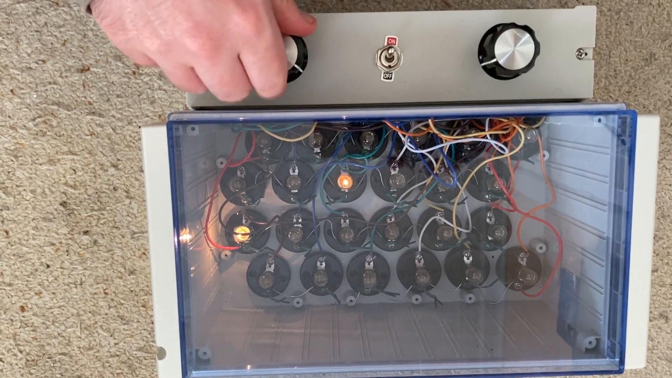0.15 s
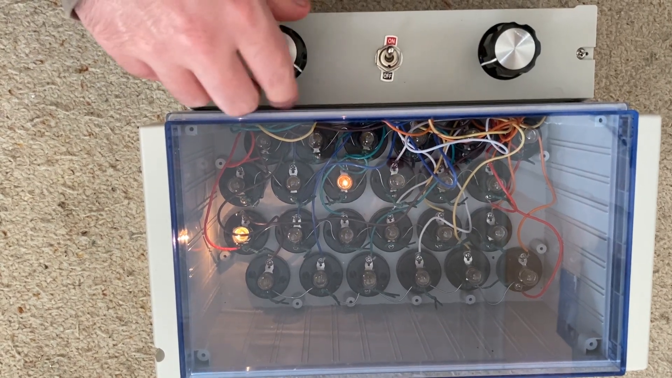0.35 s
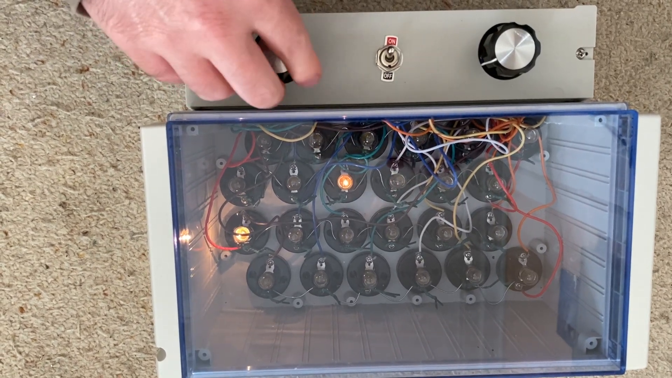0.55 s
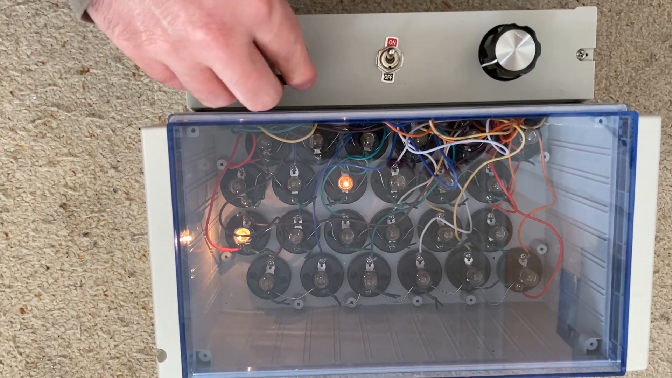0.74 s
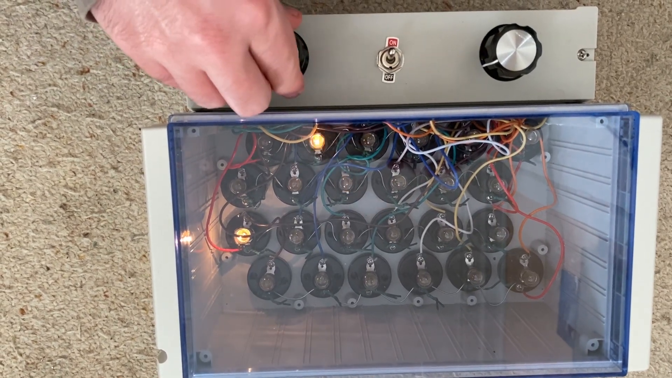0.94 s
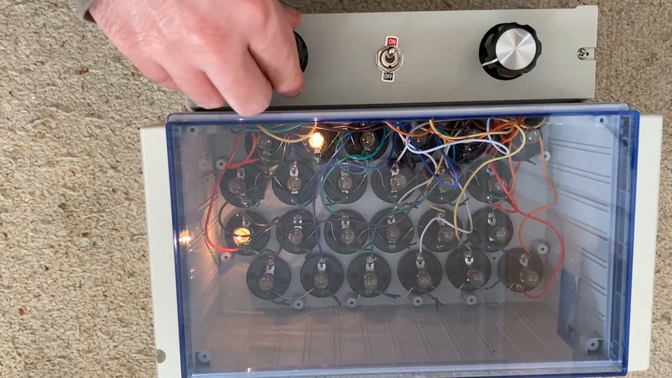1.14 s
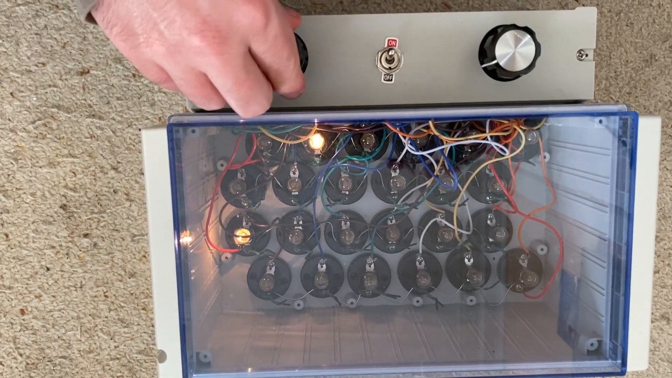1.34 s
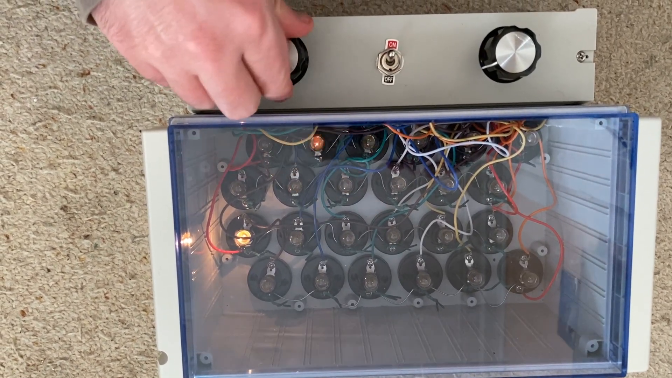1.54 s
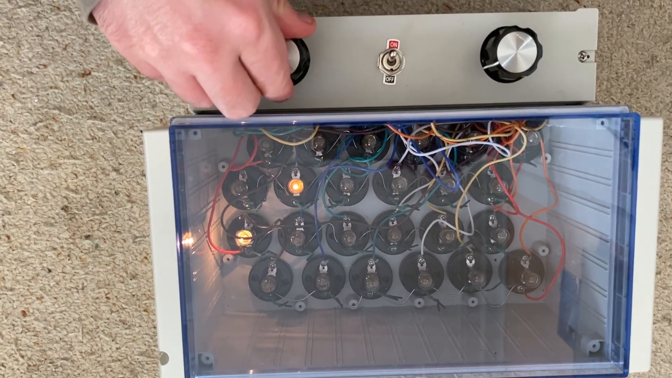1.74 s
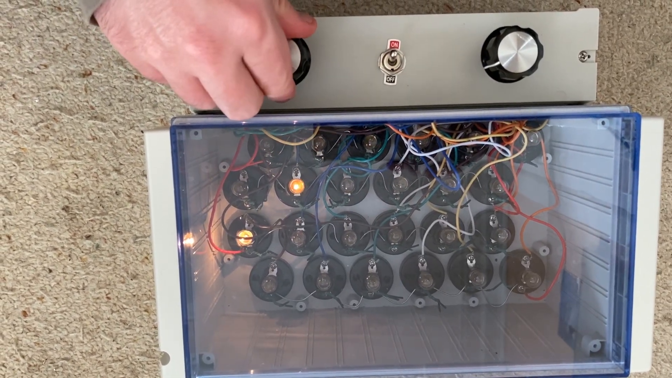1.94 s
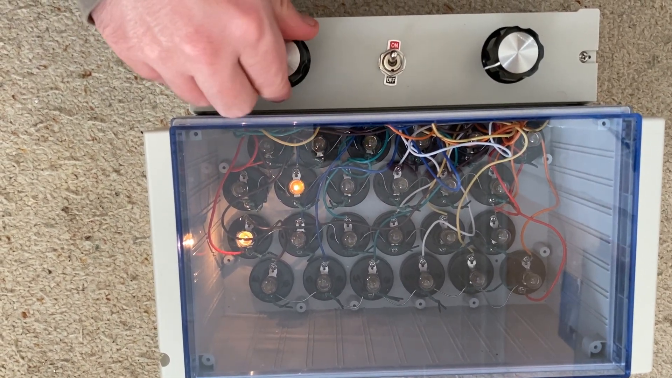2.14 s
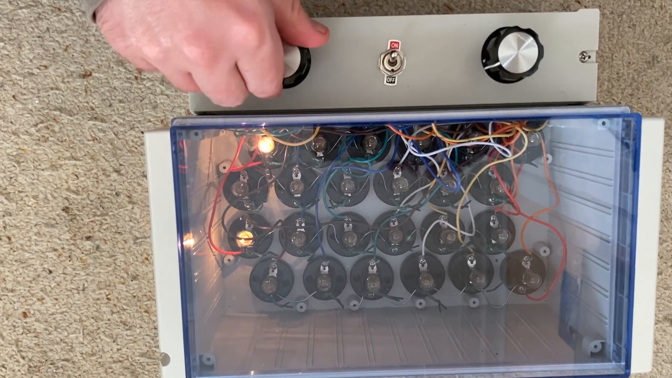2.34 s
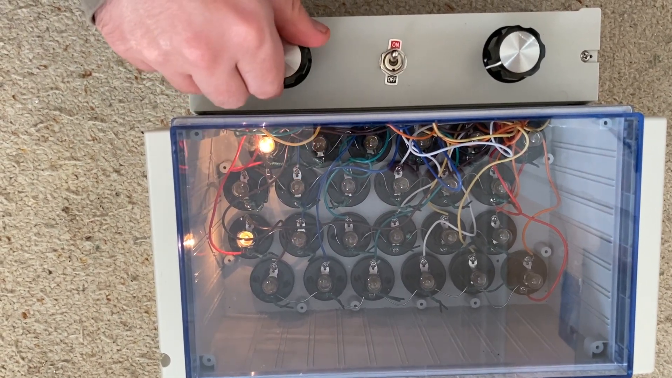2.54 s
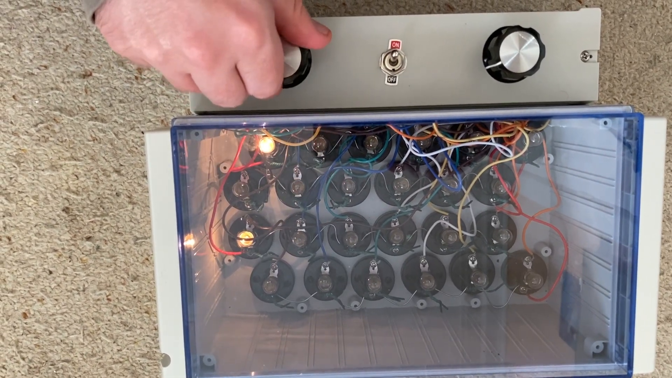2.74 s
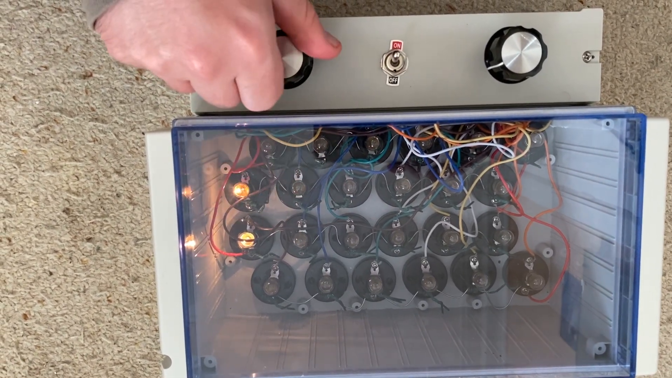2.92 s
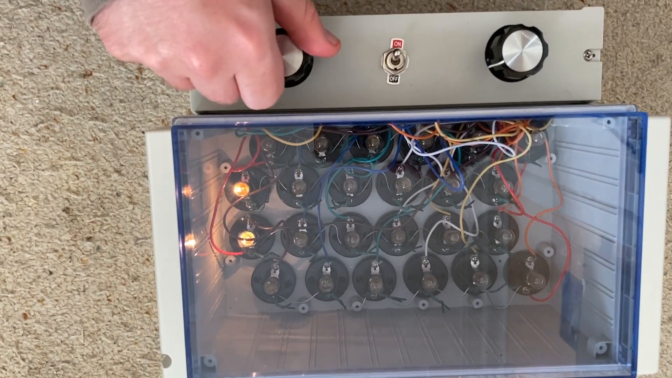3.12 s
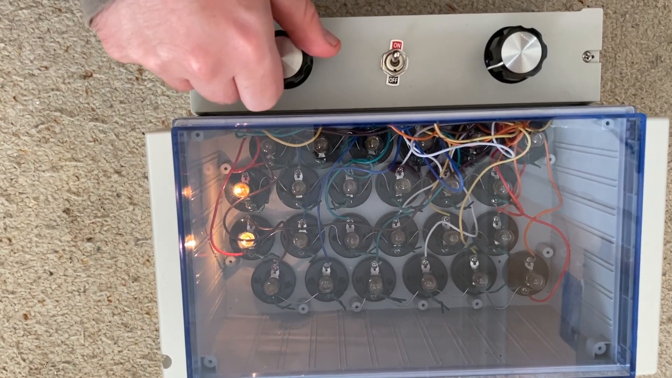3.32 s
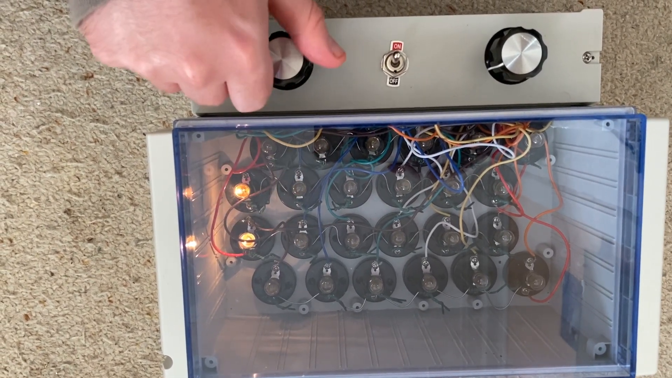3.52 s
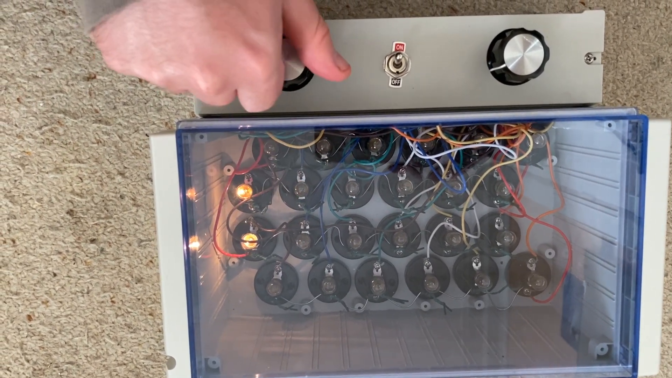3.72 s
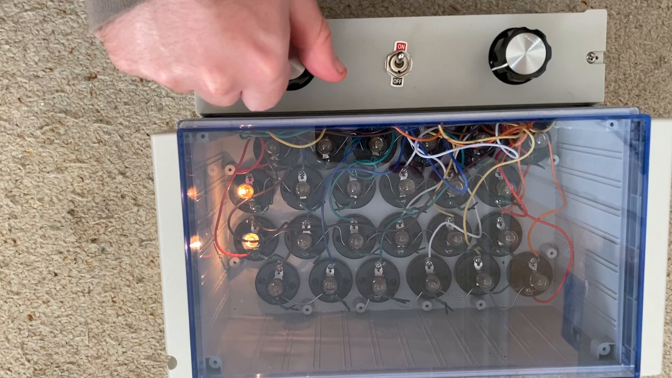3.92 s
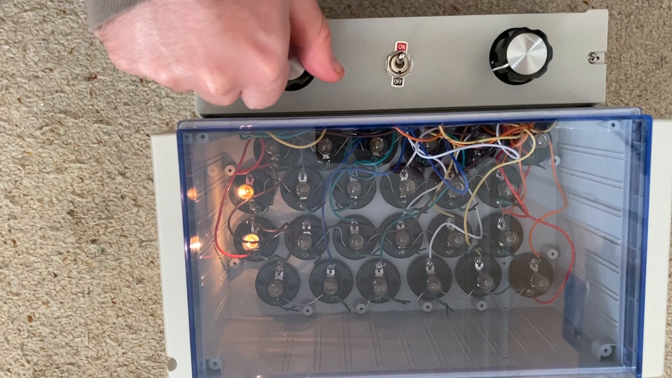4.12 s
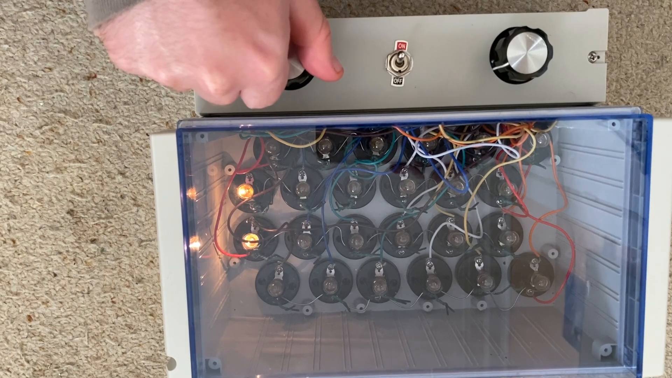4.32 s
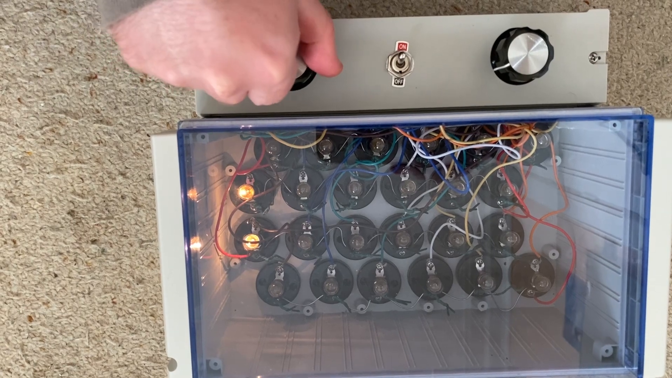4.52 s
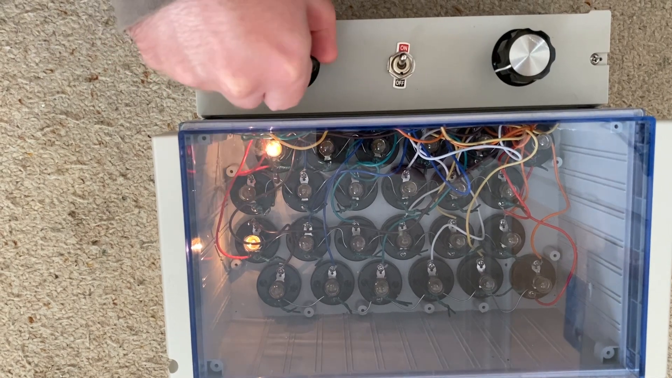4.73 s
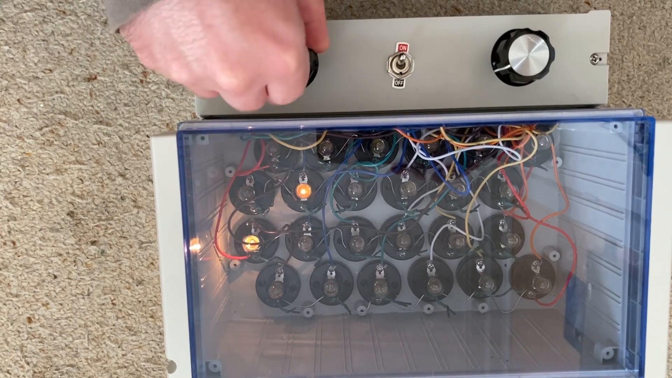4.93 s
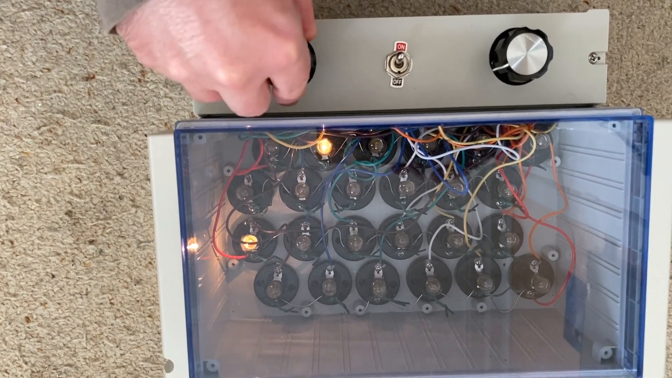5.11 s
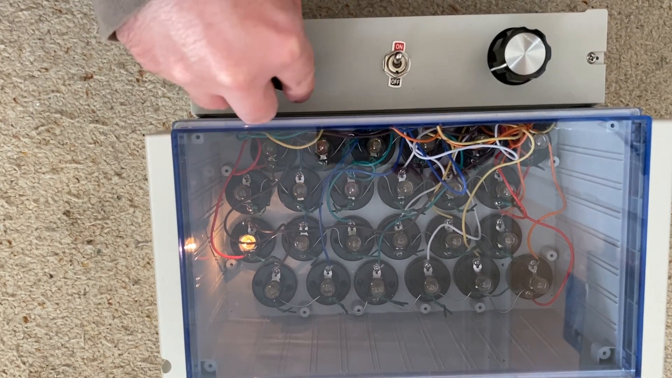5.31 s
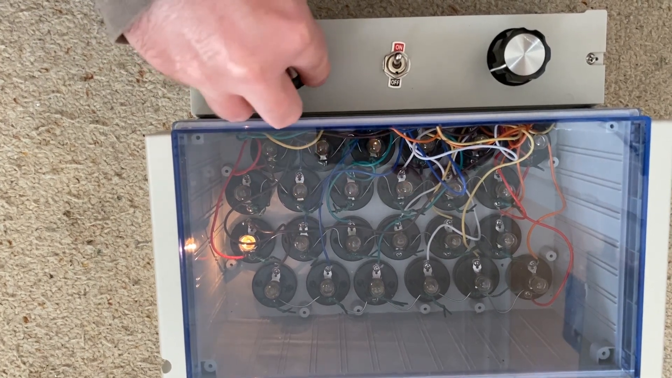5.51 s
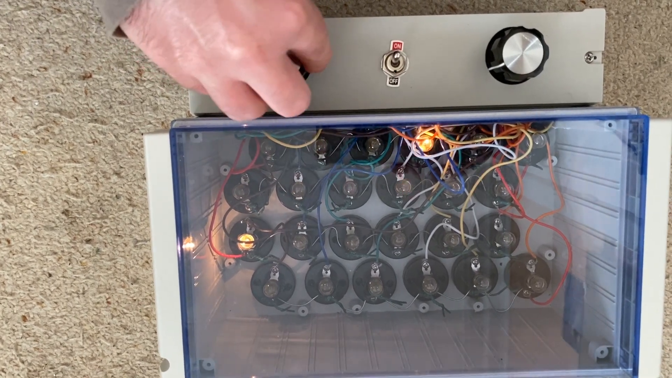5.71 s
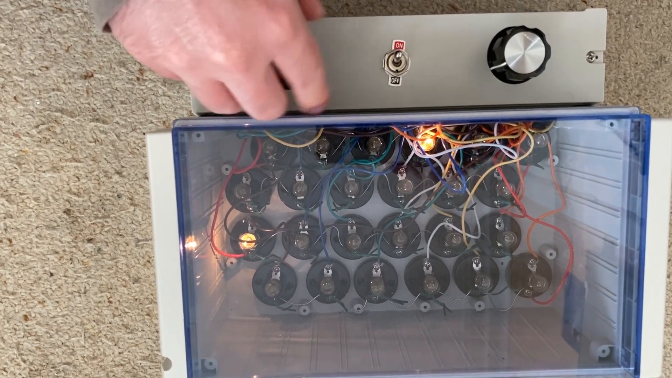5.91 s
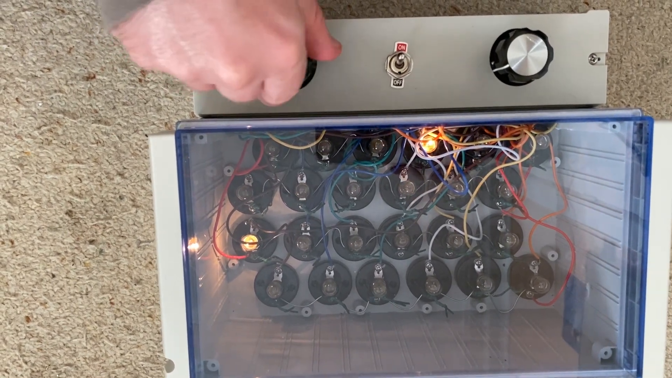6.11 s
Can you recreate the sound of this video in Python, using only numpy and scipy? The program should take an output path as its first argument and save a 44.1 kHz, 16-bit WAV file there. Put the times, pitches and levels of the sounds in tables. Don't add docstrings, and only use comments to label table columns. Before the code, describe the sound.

Sharp metallic snaps of a rotary switch, a few spaced clicks, a near-quiet pause, then a quick run ending in dull finger knocks over low hum.

```python
import sys
import numpy as np
from scipy import signal
from scipy.fft import rfft, irfft
from scipy.io import wavfile
from scipy.ndimage import uniform_filter1d

SR = 44100
rng = np.random.default_rng(int(sys.argv[2]) if len(sys.argv) > 2 else 0)


def boost_factor(decibels):
    exponent = np.asarray(decibels, float) / 20
    return 10 ** exponent


def generate_wav(sig):
    pcm = np.round(np.clip(np.atleast_2d(sig).T, -1, 1) * 32767).astype(np.int16)
    wavfile.write(sys.argv[1], SR, pcm)


N = 271656

# mode_hz, level_db, t60_s
SPRING_MODES = [(6500, -9.5, 0.023), (7470, -1, 0.0038), (8360, -7.5, 0.017), (8670, 0.5, 0.0019),
                (10310, -5.5, 0.0088), (11510, 0, 0.0025), (11610, -6.5, 0.0065), (13020, -7, 0.0034),
                (14940, -16.5, 0.006), (15400, -30, .005)]
PLATE_MODES = [(3030, -10.5, 0.036), (3330, -12, 0.0098), (4020, -0.5, 0.0094), (4430, -3.5, 0.013),
               (4626, 0, 0.013), (5286, -12.5, 0.04), (6135, -2, 0.0081)]
HOUSING_MODES = [(1350, 2.5, 0.015), (1546, -7, 0.041), (1778, 5.5, 0.012), (2068, -1, 0.03),
                 (2475, 4.5, 0.0089)]
LID_MODES = [(562, -24, 0.12), (708, -18, 0.21), (786.4, 0.5, 0.055), (912, -7, 0.061), (1041, 0, 0.022)]
PANEL_MODES = [(152.2, -12, 0.2), (257, -10.5, 0.13), (337.5, 0.5, 0.084), (430, -33.5, 0.04),
               (471, -26.5, 0.42)]
PART_MODES = [SPRING_MODES, PLATE_MODES, HOUSING_MODES, LID_MODES, PANEL_MODES]
# contact_s, offset_db, hit_spread_db, port_unlikeness, right_lag_samples, pan_db
PART_PICKUP = [(.00035, -7.5, 3.5, 0.097, 0.5, -5), (.0007, -5, 2.5, 0.61, -2.5, 6),
               (.001, -9.5, 1, 0.45, 5.5, -0.5), (.0012, -2.5, 1.5, 0.35, 3.5, -0.5),
               (.004, -3, -1.23, 0.15, 8.5, -1)]
# level_db, t60_s, colour_sharpness
ROOM_TAILS = [(-32, 0.31, 0), (-22.5, 0.29, 0.36), (-18.5, 0.24, 1), (-16.5, 0.32, 1.5), (-20, 0.66, 0.6)]

# start_s, snap_db, bounce_db, rebound_after_s, rebound_db
DETENTS = [(0.9007, -33.5, -42, 0.008, -38), (1.5451, -33, -39.5, 0.0087, -42.5),
           (2.204, -43, -44.5, .0133, -53.5), (2.801, -35.5, -47.5, 0.013, -46),
           (4.6239, -27.5, -65, 0.0051, -37.5), (4.804, -35, -77, 0.0062, -49.5),
           (5.063, -31.5, -40.5, 0.0095, -41), (5.278, -27.5, -38, .007, -41),
           (5.3974, -29, -42, 0.0093, -46), (5.5011, -29.5, -49.5, 0.0079, -45),
           (5.6402, -29.5, -58, 0.0093, -44.5)]
# spring_db, plate_db, housing_db, lid_db, panel_db
SNAP_SHARE_DB = [0.5, -11.5, -11.5, -25, -24]
BOUNCE_SHARE_DB = [5, 0.5, 0.5, -8, -12.5]
REBOUND_SHARE_DB = [-1.5, -5.5, -1.5, -8.5, -8]
# start_s, spring_plate_tick_db, housing_click_db, lid_tap_db, panel_thud_db
KNOCKS = [(0.149, -84, -79, -85, -52), (0.316, -89, -71, -57, -48), (0.3277, -54.5, -45, -37, -29),
          (0.85, -69, -58, -57, -57), (1.084, -86.5, -89, -75, -80), (1.5148, -57.5, -58, -60.5, -67),
          (1.527, -83, -76, -82, -46), (1.554, -73, -82, -52, -41.5), (2.1518, -57.5, -53, -52.5, -43),
          (2.222, -74, -73, -47, -44), (2.7557, -61, -63, -62.5, -48), (2.812, -75, -64.5, -45.5, -40),
          (3.4393, -80, -63, -58, -47.5), (3.452, -90, -71, -65, -46), (4.5111, -76.5, -65, -61, -49),
          (4.534, -93, -58, -58, -54.5), (4.607, -90, -79, -85, -56.5), (4.9947, -70, -67, -88, -77),
          (5.7712, -80, -92, -92, -61), (5.866, -91, -64, -70, -54.5), (5.9397, -50.5, -47, -48, -31.5),
          (5.9658, -59, -41.5, -39, -36), (5.972, -60.5, -54, -31, -21)]
# centre_s, pitch_hz, level_db, half_length_s
SQUEAK = (5.826, 11500, -82, .013)
# peak_s, level_db, pitch_hz, fall_20db_s (floored at 0.02)
PUSHES = [(0.03, -44.5, 54.2, 0.6), (0.159, -45.5, 54.2, 0.55), (0.241, -50, 47, -5),
          (0.411, -50.5, 43.9, 1.32), (0.942, -43.5, 52.02, 0.02), (1.15, -63, 45.44, .5),
          (1.418, -54, 61.9, -0.1), (1.63, -47, 55.32, -0.04), (1.97, -69, 46.65, -0.5),
          (2.21, -43.5, 55.4, -0.07), (2.398, -51, 55.4, 0.43), (2.618, -47, 53.8, 0.09),
          (2.75, -45.5, 59.6, -0.05), (2.849, -53.5, 58.8, 0.37), (3.079, -55, 62.14, 0.11),
          (3.269, -61, 49.4, 0.94), (3.459, -52, 46.2, 0.09), (4.15, -64, 52, 0.1),
          (4.38, -68.5, 53.8, -0.4), (4.679, -39.5, 60.7, 0.0432), (4.87, -48.5, 66.25, .06),
          (5.039, -43, 67.9, 0.01), (5.109, -50, 63.9, 0.15), (5.33, -46.5, 61.87, 0.03),
          (5.47, -54.5, 57.7, 0.14), (5.58, -51.5, 59.64, .08), (5.73, -56.5, 60.3, .08),
          (5.88, -65, 63.5, -3.5), (6.001, -36, 61.8, .085)]
# time_s, effort_db
EFFORT = [(0, 0.5), (.38, 7), (.62, 1), (.93, 6.5), (1.3, 0), (1.62, 9.5), (1.92, -5.5), (2.2, 1),
          (2.55, -9.5), (2.86, 7), (3.08, 5), (3.29, -7.5), (3.5, -4), (3.85, -11.5), (4.5, -7.5),
          (4.7, 6.5), (4.92, -4.5), (6.16, -1)]

# level_db, effort_db_per_db, push_db_per_db, drift_db
DEEP_STIR = (-68.5, 1, 0.5, 6)
LOW_STIR = (-61, 0.33, 0.3857, 1.5)
RUB_STIR = (-78.5, 1.02, 0.11, 3.3)
# freq_hz, density_db_per_hz
DEEP_SPECTRUM = [(28, -18.0), (36, 11.5), (41, 18), (50, -3), (70, -54.5)]
LOW_SPECTRUM = [(50, -15.5), (64, 4.5), (82, 3.0), (120, -2.5), (150, -13), (200, -21.0), (300, -68.0)]
LEAD_IN_SPECTRUM = [(300, -27.5), (800, 6.0), (2000, -8), (6000, -11.5), (9000, -38)]
FLAT_SPECTRUM = [(50, 0), (20000, 0)]
RUB_SPECTRUM = [(180, 3.5), (330, -1.5), (520, -12.5), (780, -6), (1200, -13), (2000, -23), (3500, -46)]
HISS_SPECTRUM = [(100, -2.5), (200, -8.5), (400, -11), (1000, -20.5), (2500, -26), (5000, -29), (9000, -33),
                 (13000, -39), (16000, -67.5)]
# freq_hz, likeness
PORT_LIKENESS = [(60, 0.93), (150, 0.88), (300, 0.64), (640, 0.038), (2000, 0.12), (6000, 0.085)]

BOUNCE_AT = 0.36
SPRING_LOSS_DB_PER_S = 801.5
LEAD_IN_DB, LEAD_IN_S = -23.5, 0.0087
ROOM_ONSET_S, GATE_S, MUFFLE = 0.0075, 0.12, 0.12
PUSH_RISE = 0.88
BOARD_MEAN_DB, HISS_DB = -58, -78
WHINE_HZ, WHINE_DB = 14300, -111
MERGE_HZ, MERGE_SHARE, PORT_LAG_SAMPLES = 6690, 0.97, 10
SELF_NOISE_DB, TOP_HZ = -95.5, 16700


def switch():
    hits, direct = contacts(), 0
    for k, modes in enumerate(PART_MODES):
        contact_s, offset_db, spread_db, unlike, lag_samples, pan_db = PART_PICKUP[k]
        left, right = part(modes, hits[:, k + 1] + offset_db, contact_s, spread_db, unlike)
        right = np.roll(right, round(lag_samples))
        direct = direct + np.array([left * boost_factor(pan_db / 2), right * boost_factor(-pan_db / 2)])
    return direct


def contacts():
    rows = [(s, tick, tick, click, tap, thud) for s, tick, click, tap, thud in KNOCKS]
    for s, snap_db, bounce_db, after_s, rebound_db in DETENTS:
        slack_db = np.eye(5)[0] * SPRING_LOSS_DB_PER_S * after_s
        rows.append((s, *np.add(snap_db, SNAP_SHARE_DB)))
        rows.append((s + BOUNCE_AT * after_s, *np.add(bounce_db, BOUNCE_SHARE_DB)))
        rows.append((s + after_s, *(rebound_db + np.array(REBOUND_SHARE_DB) - slack_db + 4.5)))
    return np.array(rows)


def part(modes, hit_db, contact_s, spread_db, unlike):
    t = np.arange(900) / SR
    shape = t / contact_s * np.exp(-t / contact_s)
    at = (contacts()[:, :1] * SR).astype(int) + np.arange(900)
    out = np.zeros((2, N))
    for hz, level_db, t60_s in modes:
        draw = rng.standard_normal((len(at), 3, 901))
        gain = boost_factor(hit_db + level_db + spread_db * draw[:, 0, 0])
        for port in range(2):
            rattle = shape * (draw[:, 0, 1:] + unlike * draw[:, 1 + port, 1:])
            push = np.abs(rattle @ np.exp(-2j * np.pi * hz * t))
            typical = np.sqrt(np.sum(rattle ** 2, axis=1))
            rattle *= (gain / np.maximum(push, typical / 2))[:, None]
            force = np.bincount(at.ravel(), rattle.ravel(), N)[:N]
            out[port] += ring(force, hz, t60_s)
    return soften(out, modes, 1.48)


def ring(force, hz, t60_s):
    radius = boost_factor(-60 / (max(t60_s, .002) * SR))
    w = 2 * np.pi * min(hz, .45 * SR) / SR
    return signal.lfilter([0, np.sin(w)], [1, -2 * radius * np.cos(w), radius * radius], force + 1e-18)


def soften(x, modes, reach):
    edge_hz = min(reach * modes[-1][0], .45 * SR)
    return signal.sosfilt(signal.butter(3, edge_hz, fs=SR, output="sos"), x)


def lead_in():
    lead = SR // 20
    rise = np.exp((np.arange(lead) - lead) / SR / LEAD_IN_S)
    envelope = np.roll(swell(contacts()[:, 3] + LEAD_IN_DB, rise), -lead)
    return envelope * coloured(LEAD_IN_SPECTRUM)


def swell(hit_db, shape):
    energy = np.bincount((contacts()[:, 0] * SR).astype(int), boost_factor(2 * hit_db), N)
    return np.sqrt(np.maximum(signal.fftconvolve(energy, shape ** 2)[:N], 0))


def squeak():
    centre_s, hz, level_db, half_s = SQUEAK
    pressure = np.exp(-((np.arange(N) / SR - centre_s) / half_s) ** 2)
    return boost_factor(level_db) * pressure * rms_one(ring(rng.standard_normal(N), hz, .015))


def room():
    hits, t, out = contacts(), np.arange(SR // 3) / SR, 0
    diffuse = coloured(FLAT_SPECTRUM)
    for k, modes in enumerate(PART_MODES):
        level_db, t60_s, sharpness = ROOM_TAILS[k]
        onset = 1 - np.exp(-t / ROOM_ONSET_S)
        gate = np.exp(-(t / GATE_S) ** 5.0)
        fall = boost_factor(-60 * t / t60_s) * onset * gate
        radiated_db = hits[:, k + 1] + MUFFLE * (hits[:, 2] - hits[:, k + 1])
        colour = 0
        for i, (hz, mode_db, mode_t60_s) in enumerate(modes):
            colour = colour + (-1) ** i * boost_factor(mode_db) * ring(diffuse, hz, sharpness * mode_t60_s)
        out = out + swell(radiated_db + level_db, fall) * rms_one(soften(colour, modes, 0.83))
    return out


def floor_board():
    hz = in_time(PUSHES)[1]
    return np.sqrt(2) * boost_factor(board_level()) * np.sin(2 * np.pi * np.cumsum(hz) / SR)


def board_level():
    t, out = np.arange(N) / SR, np.full(N, -95.)
    for s, level_db, _, fall_s in PUSHES:
        away_s = np.maximum(t - s, (s - t) / PUSH_RISE)
        out = np.maximum(out, level_db - 20 * away_s / max(fall_s, .02))
    return out


def background():
    deep = stirred(*DEEP_STIR) * coloured(DEEP_SPECTRUM)
    low = stirred(*LOW_STIR) * coloured(LOW_SPECTRUM)
    rubbing = stirred(*RUB_STIR) * coloured(RUB_SPECTRUM)
    return deep + low + rubbing + boost_factor(HISS_DB) * coloured(HISS_SPECTRUM)


def stirred(level_db, effort, pushes, drift_db):
    drift = np.interp(np.arange(N) / SR, np.arange(60) / 9, rng.standard_normal(60))
    board_db = uniform_filter1d(board_level(), size=SR // 12) - BOARD_MEAN_DB
    return boost_factor(level_db + effort * in_time(EFFORT)[0] + pushes * board_db + drift_db * drift)


def power_whine():
    return boost_factor(WHINE_DB) * rms_one(ring(rng.standard_normal(N), WHINE_HZ, .15))


def coloured(spectrum):
    hz = np.maximum(np.fft.rfftfreq(N, 1 / SR), 1)
    mid, side = rfft(rng.standard_normal((2, N)))
    alike = np.clip(at_hz(PORT_LIKENESS, hz), 0, 1)
    ports = np.sqrt(1 + alike) * mid + np.sqrt(1 - alike) * side * [[1], [-1]]
    passed = hz > .8 * spectrum[0][0]
    return rms_one(irfft(ports * boost_factor(at_hz(spectrum, hz)) * passed, N))


def at_hz(points, hz):
    points = np.array(points)
    return np.interp(np.log(hz), np.log(points[:, 0]), points[:, 1])


def in_time(rows):
    s, *columns = np.transpose(rows)
    return [np.interp(np.arange(N) / SR, s, c) for c in columns]


def rms_one(x):
    return x / np.sqrt(np.mean(x ** 2) + 1e-20)


def scene():
    fade_in = np.minimum(np.arange(N) / SR / .008, 1)
    handled = lead_in() + switch() + squeak()
    return fade_in * (handled + room() + floor_board() + background() + power_whine())


def roll_off(x):
    return signal.sosfilt(signal.butter(12, 16750, fs=SR, output="sos"), x)


def record(dry):
    hz = np.fft.rfftfreq(N, 1 / SR)
    merged = MERGE_SHARE / (1 + (MERGE_HZ / (hz + 1)) ** 24)
    left, right = rfft(dry)
    late = -right * np.exp(-2j * np.pi * hz * PORT_LAG_SAMPLES / SR)
    left = merged * late + np.sqrt(1 - merged ** 2) * left
    ports = irfft(np.array([left, right]), N) + boost_factor(SELF_NOISE_DB) * rng.standard_normal((2, N))
    ports = signal.sosfilt(signal.cheby2(10, 40, TOP_HZ, fs=SR, output="sos"), ports)
    return roll_off(ports)


dry = scene()
out = record(dry)
generate_wav(out)
```